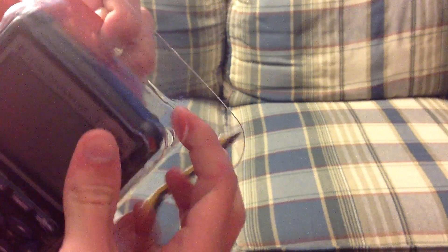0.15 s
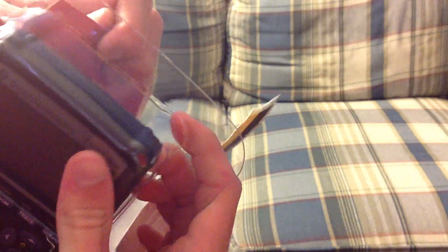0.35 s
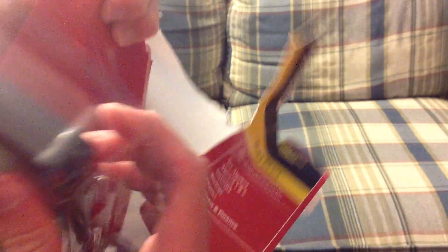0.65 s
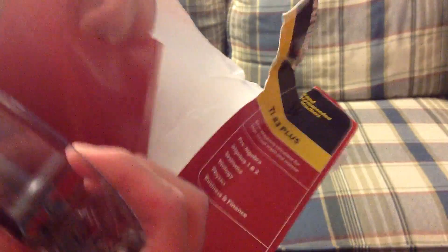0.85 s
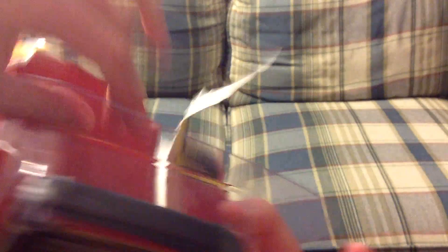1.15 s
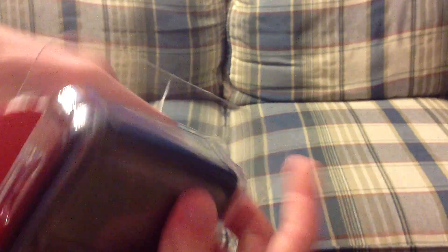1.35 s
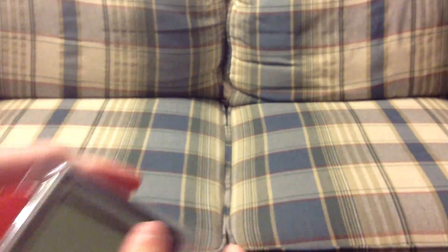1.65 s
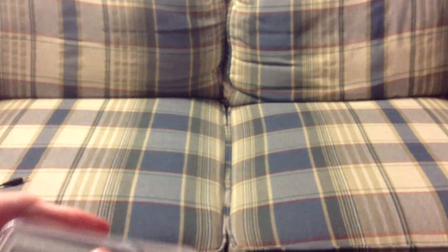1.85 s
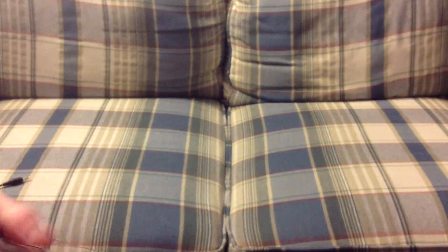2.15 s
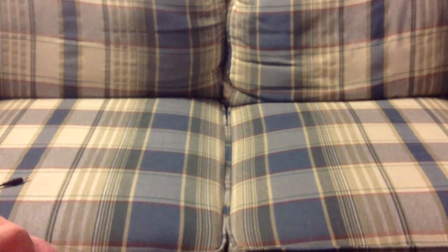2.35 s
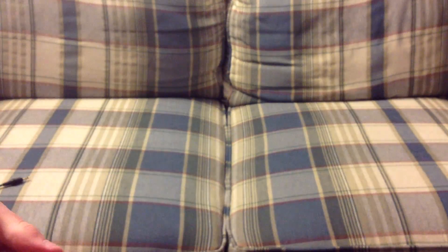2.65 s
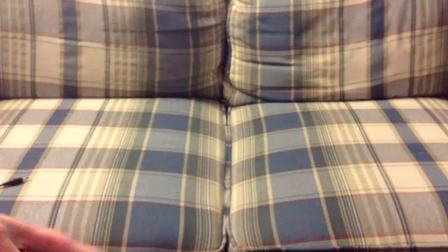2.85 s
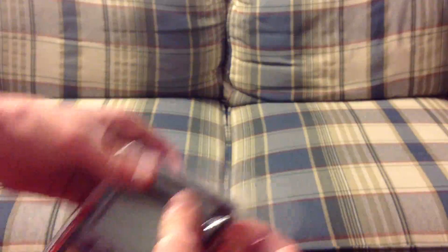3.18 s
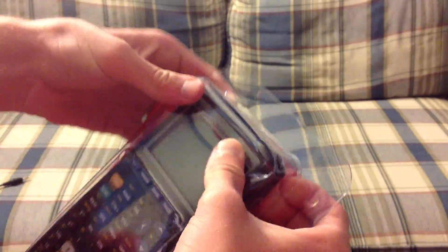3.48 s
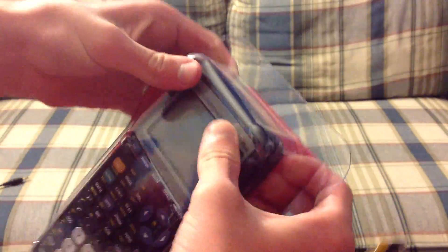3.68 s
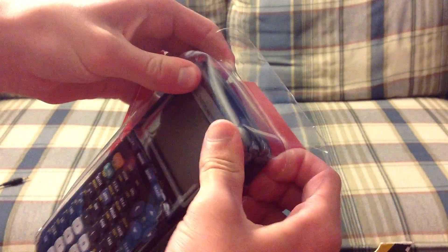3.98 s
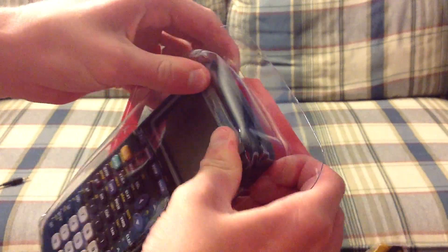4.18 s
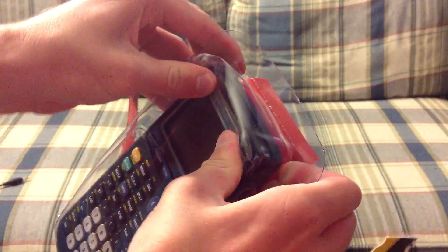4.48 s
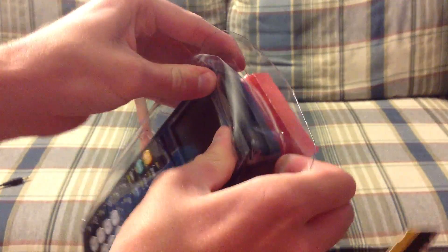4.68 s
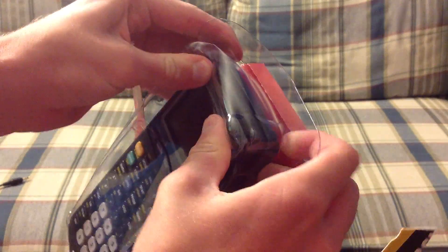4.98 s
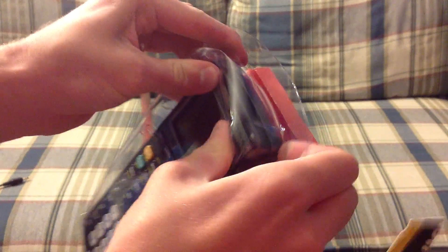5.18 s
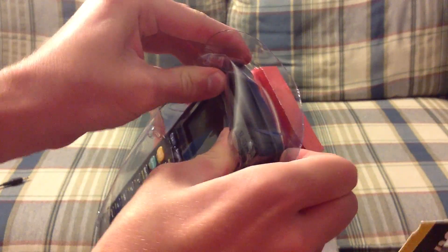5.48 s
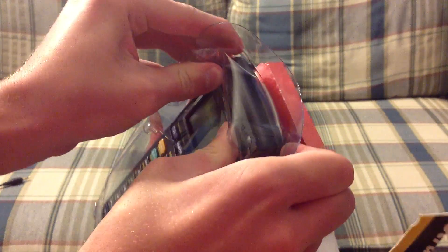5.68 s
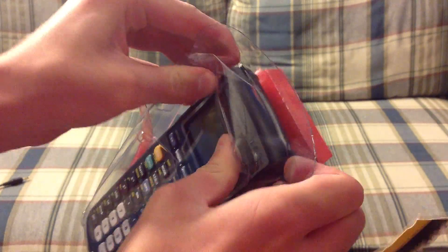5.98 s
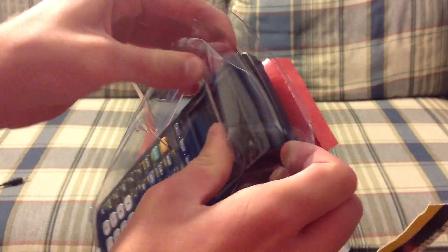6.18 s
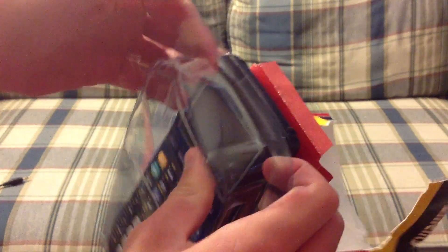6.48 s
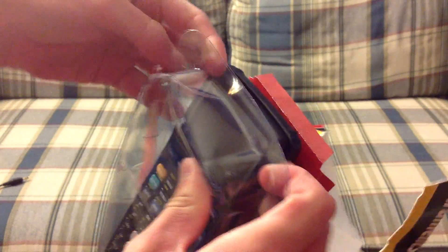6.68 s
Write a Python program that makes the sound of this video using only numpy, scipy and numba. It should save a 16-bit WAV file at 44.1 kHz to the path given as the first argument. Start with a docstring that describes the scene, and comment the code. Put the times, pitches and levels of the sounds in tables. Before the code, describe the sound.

Close by in a small furnished room, with faint steady hiss, hands work at a stiff plastic shell. From 0 to 0.3 s edges slip with short chattering clicks and a thin high ringing; scraping swells at 0.6 s, and another pair of slips bites at 0.83. Around 1.0-1.3 s plastic slides firmly on card with crackles, snaps and a brief singing edge. Snaps cluster at 1.7-2.1 s, with a bright crack at 2.3, then a lull. Soft sliding returns near 2.9 s; snaps follow, with a strong low hollow pop at 3.39. Small ticks and snaps thin out past 4.2 s into very quiet rustle, broken by two light snaps near 4.96. A fingertip creaks faintly at 5.4-5.6 s. A hard, bright pop lands at 5.81, hollow knocks at 6.23, and the loudest tight cluster of pops at 6.44, then quick slips at 6.6 and tiny ticks to 6.7.

```python
"""Opening a stiff plastic package

Hands work a pocket calculator out of a stiff clear plastic shell with a card insert, close by.
Panels of the shell buckle with snaps and hollow pops, made of fading tones and noise bursts.
Cut edges chatter, slip and sing; plastic and card slide and crackle, made of many tiny releases.
A small furnished room answers with fading reflections, over a faint steady hiss of shaped noise.
"""
import sys
import numpy as np
from scipy import signal
from scipy.fft import rfft, irfft, next_fast_len
from scipy.io import wavfile
from scipy.ndimage import map_coordinates
from numba import njit

SR = 44100
rng = np.random.default_rng(int(sys.argv[2]) if len(sys.argv) > 2 else 0)


def int16_out(signal):
    """Quantize to a 16-bit WAV file."""
    q = np.round(np.clip(np.atleast_2d(signal).T, -1, 1) * 32767)
    wavfile.write(sys.argv[1], SR, q.astype(np.int16))


N = 301203  # length in samples
TOP_HZ = 15700  # nothing is kept above this pitch
AGE = np.arange(SR // 8) / SR  # seconds since the start of a short sound
BLOW_S = 0.005  # the level of a short sound is its energy spread over this many seconds

# Panels buckling. Each row: start in seconds, ring level in dB, ring corner in Hz,
# crack level in dB, thump level in dB, name of the panel.
BUCKLINGS = [(1.0608, -34, 3560, -40.5, -57, "rim"), (1.341, -43, 2230, -48, -43, "rim"),
             (1.455, -33, 1730, -57, -47, "flap"), (1.7354, -37, 1670, -49, -39, "back"),
             (1.7659, -38, 2400, -47, -43, "flap"), (1.967, -37, 2780, -38, -31, "sheet"),
             (1.9733, -39, 2710, -40.5, -37, "flap"), (2.3221, -30, 3960, -30.5, -34, "rim"),
             (3.064, -36, 1770, -48, -31, "pocket"), (3.2131, -40.5, 3780, -40.5, -50, "pocket"),
             (3.335, -42, 1580, -49, -39.5, "rim"), (3.3904, -25, 1410, -51, -17, "back"),
             (3.674, -41, 2520, -69, -52, "rim"), (3.9015, -46, 2940, -51, -35, "pocket"),
             (3.9205, -38, 2000, -43.5, -35, "rim"), (4.0801, -67, 690, -74, -40, "rim"),
             (4.1537, -42, 4130, -49, -44, "rim"), (4.957, -40, 2470, -46, -60, "rim"),
             (4.9745, -36, 2370, -43, -62, "rim"), (5.8138, -25, 4580, -25, -15.5, "pocket"),
             (5.959, -31, 3580, -41.5, -32.5, "pocket"), (6.0569, -35, 1700, -68, -37.5, "rim"),
             (6.2235, -30, 860, -51, -28, "back"), (6.2301, -21, 1200, -45.5, -20.5, "back"),
             (6.4399, -14, 2570, -33.5, -8, "dome"), (6.4472, -19.5, 1550, -33.5, -14, "rim"),
             (6.455, -17.5, 1520, -42, -35, "rim")]
FOLD_CYCLES = 0.37  # a fold takes this many cycles of its corner pitch to give way

# The panels that can flip. Each name leads to: time to fade by 60 dB in seconds,
# typical share by which the grip shifts the pitch, modes (each: pitch in Hz, level in dB).
PANELS = {"sheet": (0.085, 0.01, [(160, 0), (400, -13)]), "back": (0.03, 0.01, [(245, 0), (370, -7),
          (835, -12), (1500, -13)]), "dome": (0.038, 0.004, [(295, 0), (568, -4.5), (1140, -11), (1400, -7),
          (1870, -14), (2120, -15), (2510, -16)]), "pocket": (0.021, 0.015, [(322, 0), (660, -15),
          (1560, -14), (2130, -17)]), "flap": (0.022, 0.07, [(180, -11), (350, 0)]),
          "rim": (0.015, 0.1, [(450, 0), (1300, -13)])}

# Edges scraping ever harder, then letting go. Each row: release in seconds,
# build-up time constant in seconds, ring level in dB, crack level in dB, thump level in dB.
EDGE_SLIPS = [(0.095, 0.0027, -32, -39.5, -42.5), (0.1422, 0.0047, -28, -49, -52),
              (0.545, 0.0053, -41.5, -60, -45), (0.831, 0.013, -35, -39, -43),
              (0.8397, 0.0052, -25, -28.5, -34.5), (1.118, 0.0023, -27, -27, -35.5),
              (1.237, 0.0033, -33, -31.5, -33), (2.07, 0.0048, -25.5, -36, -47),
              (6.6041, 0.0074, -37.5, -50, -68), (6.634, 0.0045, -38, -38, -44.5)]

# Freed edges singing. Each row: start in seconds, starting level in dB, pitch in Hz.
EDGE_ZINGS = [(0.145, -41, 4220), (0.146, -44, 6900), (1.125, -47, 5240), (1.172, -46, 5530)]

# Small creases ticking. Each row: start in seconds, ring level in dB.
CREASE_TICKS = [(0.229, -45), (0.5173, -51), (0.6045, -42), (0.6195, -41), (0.7777, -39.5), (0.9872, -33),
                (1.036, -36), (1.171, -46), (1.217, -44), (1.2515, -36), (1.622, -44), (2.0587, -50),
                (3.6325, -48), (3.6848, -47), (3.863, -52.5), (3.8737, -47.5), (3.887, -53), (4.604, -53.5),
                (5.749, -47.5), (6.2403, -38), (6.6909, -46), (6.7112, -44)]
TICK_CRACK_DB = -12  # sharp edge of a tick, relative to its ring

# A fingertip juddering over the shell. Each row: start in seconds, length in seconds, level in dB.
FINGER_DRAGS = [(5.419, 0.079, -53.5), (5.523, 0.033, -48), (5.589, 0.033, -46.5)]
DRAG_SLIPS_PER_S = 230  # roughly, as the gaps are uneven

# Strokes of plastic sliding on card and fingers. Each row: middle in seconds, length in seconds,
# scrape level in dB, hiss level in dB, pitch of the rubbed span in Hz.
SLIDING_STROKES = [(0.023, 0.06, -45, -55, 3440), (0.177, 0.34, -52.5, -53, 1890),
                   (0.284, 0.038, -51, -53.5, 1400), (0.6, 0.48, -51, -53, 1440),
                   (0.603, 0.093, -39.5, -50, 2180), (0.813, 0.2, -42, -50, 1250),
                   (1.014, 0.15, -37.5, -42.5, 1290), (1.187, 0.054, -41, -44.5, 980),
                   (1.256, 0.098, -47, -48, 1770), (1.714, 0.19, -52.5, -52, 1700),
                   (2.068, 0.061, -41, -42, 1760), (2.9, 0.21, -56.5, -53, 2470),
                   (3.038, 0.23, -52.5, -51.5, 2340), (3.188, 0.14, -51.5, -52.5, 5800),
                   (3.439, 0.079, -47.5, -52.5, 3420), (4.238, 0.049, -53.5, -55.5, 2090),
                   (4.26, 0.45, -71, -78, 2160), (5.456, 1, -67, -68.5, 1330),
                   (5.612, 0.079, -49.5, -53, 1610), (6.258, 0.14, -47.5, -59, 1030),
                   (6.461, 0.052, -36.5, -57, 2020), (6.633, 0.047, -38.5, -43, 2370),
                   (6.7, 1, -61, -69, 1440)]
STROKE_FADE_DB = 15  # how far a stroke has dropped at either end of its length
STROKE_SHAPE = 1.93  # 1 = pointed swell, 2 = round bell
REST_SCRAPE_DB, REST_HISS_DB = -72.5, -69  # the hands never hold quite still

# Tiny random creases: how many, their level relative to the scrape of the moment, and its spread.
CREASES_PER_S, CREASE_DB, CREASE_SPREAD_DB = 170, -11.5, 3.5
CREASE_OCTAVES = 0.65  # spread of their pitch
CREASE_CYCLES = 2.5  # time constant of their fading, in cycles

# Bending modes of the shell. Each row: pitch in Hz, relative level in dB.
SHELL_MODES = [(568, 10), (720, -2.5), (841, -6), (1078, -16.5), (1140, 5), (1402, 5.5), (1590, 8.5),
               (1854, 2.5), (2134, 5), (2508, 5.5), (3256, 6.5), (4202, -5)]
# Tone colour of the dense bending waves. Each row: frequency in Hz, relative level in dB per Hz.
FLEX_COLOUR = [(200, -29), (450, 18.5), (1500, -0.5), (2600, 2), (4500, -3), (16000, -18.5)]
# Tone colour of sharp cracks and fine hiss. Each row: frequency in Hz, relative level in dB per Hz.
CRACK_COLOUR = [(1500, -31), (4000, 3), (6000, -0.5), (15500, -7)]
# Tone colour of rubbed plastic. Each row: frequency in Hz, relative level in dB per Hz.
SCRAPE_COLOUR = [(200, -31), (500, -7), (1000, 6), (2500, 3), (4500, -5.5), (9000, -30)]
# Tone colour of the air and walls of the shell. Each row: frequency in Hz, relative level in dB per Hz.
HOLLOW_COLOUR = [(100, -17), (300, 2), (600, 1), (800, -10.5), (1200, -8), (4500, -31.5)]
# Tone colour of the steady background. Each row: frequency in Hz, relative level in dB per Hz.
QUIET_COLOUR = [(30, -43), (140, -3), (360, -6), (560, -19.5), (2360, -16), (2760, -19.5), (15500, -23)]
QUIET_DB = -60  # level of the background before the microphone's bass cut

# How long the room rings. Each row: frequency in Hz, time to fade by 60 dB in seconds.
ROOM_FADE = [(120, 0.14), (300, 0.21), (5000, 0.25), (15000, 0.15)]
# How strongly the room answers. Each row: frequency in Hz, level of the answer in dB.
ROOM_LEVEL = [(100, -8.5), (280, -9), (520, -7.5), (2400, -11.5), (15000, -6)]


def amp(db):
    """Turns decibels into a gain."""
    return 10 ** (np.asarray(db) / 20)


def unit(x):
    """Scales a sound to an average (rms) strength of 1."""
    return x / np.sqrt(np.mean(x ** 2) + 1e-20)


def blow(x, db):
    """Gives a short sound the energy of BLOW_S seconds at this level."""
    return amp(db) * unit(x) * np.sqrt(BLOW_S * SR / len(x))


def along(points, hz):
    """Reads a curve of (Hz, value) points on a logarithmic pitch axis."""
    f, v = np.transpose(points)
    return np.interp(np.log(hz + 1), np.log(f + 1), v)


def colour(x, spectrum):
    """Filters a sound to a (Hz, dB) spectrum, with no sound ahead of its cause."""
    m = 2 * next_fast_len(len(x))
    log_gain = np.log(amp(along(spectrum, np.fft.rfftfreq(m, 1 / SR))))
    # folding the cepstrum forward in time makes the filter minimum phase
    cepstrum = irfft(log_gain)
    cepstrum[1:m // 2] *= 2
    cepstrum[m // 2 + 1:] = 0
    response = np.exp(rfft(cepstrum))
    return irfft(rfft(x, m) * response)[:len(x)]


def lowpass(x, hz, order):
    """Removes what lies above a pitch."""
    return signal.sosfilt(signal.butter(order, min(hz, TOP_HZ), fs=SR, output="sos"), x)


def highpass(x, hz):
    """Removes what lies below a pitch."""
    return signal.sosfilt(signal.butter(2, hz, "highpass", fs=SR, output="sos"), x)


def wobble(rate):
    """Draws a smooth random curve through this many random points a second."""
    knots = rng.standard_normal(int(N * rate / SR) + 4)
    return map_coordinates(knots, [np.arange(N) * rate / SR])


def add(track, s, x):
    """Mixes a sound into the track from time s in seconds."""
    part = track[max(round(s * SR), 0):][:len(x)]
    part += x[:len(part)]


def burst(t60):
    """Makes noise that starts at once and fades by 60 dB in t60 seconds."""
    return rng.standard_normal(len(AGE)) * amp(-60 * AGE / t60)


@njit
def resonate(x, hz, damping):
    """Drives one springy resonance whose pitch can move."""
    out = np.zeros(len(x))
    position = speed = 0.
    for i in range(len(x)):
        step = 2 * np.sin(np.pi * hz[i] / SR)
        position += step * speed
        speed += step * (x[i] - position - damping * speed)
        out[i] = speed
    return out


def snaps():
    """A buckling panel cracks, rings and thumps; a wide, soft fold rings duller."""
    out = np.zeros(N)
    for s, ring_db, corner_hz, crack_db, thump_db, panel in BUCKLINGS:
        shell = shell_ring(detune=0.025, scatter_db=1, flex_t60=0.042, flex_db=2)
        # the width of the fold picks the band of waves that it launches
        ring = highpass(lowpass(shell, corner_hz, order=3), corner_hz * 0.34)
        ring *= 1 - np.exp(-AGE * corner_hz / FOLD_CYCLES)
        crack = colour(burst(t60=0.016), CRACK_COLOUR)
        add(out, s, blow(ring, ring_db) + blow(crack, crack_db) + blow(thump(panel), thump_db))
    return out


def shell_ring(detune, scatter_db, flex_t60, flex_db):
    """Modes shift with the grip and sound at new strengths, over a blur of dense bending waves."""
    hz, db = np.transpose(SHELL_MODES)[:, :, None]
    t60 = 0.029 * (hz / 1000) ** -.5  # seconds; short waves die sooner
    shift, strength, side = rng.standard_normal((3, len(SHELL_MODES), 1))
    fading = np.sign(side) * amp(db + scatter_db * strength - 60 * AGE / t60)
    modes = fading * np.sin(2 * np.pi * hz * (1 + detune * shift) * AGE)
    blur = unit(colour(burst(flex_t60), FLEX_COLOUR))
    return unit(modes.sum(axis=0)) + amp(flex_db) * blur


def thump(panel, rise_cycles=0.29):
    """A panel flips and swings in its own modes, quick ones first, damped by the hand."""
    t60, grip, modes = PANELS[panel]
    hz, db = np.transpose(modes)[:, :, None]
    onset = 1 - np.exp(-AGE * hz / rise_cycles)
    shifted_hz = hz * (1 + grip * rng.standard_normal())
    swing = -(amp(db) * onset * np.sin(2 * np.pi * shifted_hz * AGE)).sum(axis=0)
    # slow motion radiates little sound
    return highpass(swing * amp(-60 * AGE / t60), hz.min() * 0.74)


def slips(lead=0.02, release=0.0006):
    """An edge chatters harder and harder until it comes free and the panel swings back (lead, release in s)."""
    out = np.zeros(N)
    for s, build, ring_db, crack_db, thump_db in EDGE_SLIPS:
        # the force grows up to the release, then collapses
        force = np.exp(np.minimum((AGE - lead) / build, (lead - AGE) / release))
        chatter = force * rng.standard_normal(len(AGE))
        shell = shell_ring(detune=.03, scatter_db=5, flex_t60=.005, flex_db=6)
        shell = shell * amp(-60 * AGE / 0.057)  # the rubbing edge damps it further
        ring = highpass(signal.fftconvolve(chatter, shell)[:len(AGE)], 1380)
        crack = colour(chatter, CRACK_COLOUR)
        add(out, s - lead, blow(ring, ring_db) + blow(crack, crack_db))
        add(out, s, blow(thump("flap"), thump_db))
    return out


def zings(t60=0.16, damping=0.02):
    """A freed edge skates on over the shell and sings in a narrow, slightly wandering band that fades."""
    out, t = np.zeros(N), np.arange(N) / SR
    for s, db, hz in EDGE_ZINGS:
        song = resonate(rng.standard_normal(N), hz * (1 + .01 * wobble(45)), damping)
        add(out, s, amp(db - 60 * t / t60) * unit(song))
    return out


def ticks():
    """A small crease gives one short dry tick."""
    out = np.zeros(N)
    for s, db in CREASE_TICKS:
        ring = highpass(shell_ring(detune=.06, scatter_db=3, flex_t60=.012, flex_db=3), 800)
        crack = colour(burst(t60=0.015), CRACK_COLOUR)
        add(out, s, blow(ring, db) + blow(crack, db + TICK_CRACK_DB))
    return out


def drags():
    """A fingertip sticks and slips at an uneven rate; each slip knocks the hollow shell: a low creak."""
    out = np.zeros(N)
    for s, length, db in FINGER_DRAGS:
        gaps, sizes = rng.standard_normal((2, 64))
        moments = np.cumsum(np.exp(.3 * gaps)) / DRAG_SLIPS_PER_S
        moments -= moments[0]
        keep = moments < length
        samples = (moments[keep] * SR).astype(int)
        knocks = np.bincount(samples, amp(3 * sizes[keep]), minlength=SR // 4)
        creak = colour(knocks, HOLLOW_COLOUR)
        # the level is that of the creak's energy spread over the drag
        add(out, s, amp(db) * unit(creak) * np.sqrt(length * SR / len(creak)))
    return out


def rubbing():
    """Plastic slides on card and fingers; the same releases ring the free span and fizz in the treble."""
    scrape_db, hiss_db, span_hz = hand_motion()
    grains = friction(rate=420, spread_db=5, smooth_db=-3)
    sheet = unit(colour(grains, SCRAPE_COLOUR))
    # the contact point wanders, and the ringing span with it
    ringing = unit(resonate(sheet, span_hz * 2 ** (0.1 * wobble(25)), 0.23))
    scrape = amp(scrape_db) * unit(sheet + ringing)
    fizz = colour(grains + rng.standard_normal(N), CRACK_COLOUR)
    hiss = amp(hiss_db) * unit(fizz)
    # the hands rumble even when little slides
    hollow = colour(friction(rate=300, spread_db=10, smooth_db=-1.5), HOLLOW_COLOUR)
    rumble = amp(0.49 * scrape_db - 29.5) * unit(hollow)
    # the grip trembles, so the sound comes in quick clumps; the fine hiss stays steadier
    pressure = unit(amp(2.4 * wobble(45) + 2 * wobble(140)))
    return pressure * (scrape + rumble) + pressure ** 0.91 * hiss


def hand_motion():
    """Strokes swell and fade as bells, the strongest counting most for the pitch: scrape dB, hiss dB, span Hz."""
    middle, length, scrape_db, hiss_db, hz = np.transpose(SLIDING_STROKES)[:, :, None]
    t = np.arange(N) / SR
    coarse = t[::64]  # slow curves need few points
    swell_db = -STROKE_FADE_DB * np.abs(2 * (coarse - middle) / length) ** STROKE_SHAPE
    scrape_power = amp(scrape_db + swell_db) ** 2 + 1e-20
    hiss_power = amp(hiss_db + swell_db) ** 2
    controls = (10 * np.log10(scrape_power.sum(axis=0) + amp(REST_SCRAPE_DB) ** 2),
                10 * np.log10(hiss_power.sum(axis=0) + amp(REST_HISS_DB) ** 2),
                (scrape_power * hz).sum(axis=0) / scrape_power.sum(axis=0))
    return [np.interp(t, coarse, control) for control in controls]


def friction(rate, spread_db, smooth_db):
    """Tiny stick-slip releases of very uneven size, rate a second, on smooth sliding noise."""
    moments = rng.random(N) < rate / SR
    sizes = amp(spread_db * np.clip(rng.standard_normal(N), -2, 2))
    releases = moments * rng.choice([-1, 1], N) * sizes
    return unit(unit(releases) + amp(smooth_db) * rng.standard_normal(N))


def crinkle():
    """Tiny creases ping at random, pitched around the rubbed span, louder as the hands work harder."""
    out = np.zeros(N)
    scrape_db, _, span_hz = hand_motion()
    count = int(CREASES_PER_S * N / SR)
    starts = rng.integers(N, size=count)
    variations = np.clip(rng.standard_normal((count, 2)), -2, 2)
    for i, (strength, width) in zip(starts, variations):
        hz = min(span_hz[i] * 2 ** (CREASE_OCTAVES * (width + .5)), TOP_HZ)
        cycles = AGE * hz
        ping = np.sin(2 * np.pi * cycles) * np.exp(-cycles / CREASE_CYCLES)
        add(out, i / SR, blow(ping, scrape_db[i] + CREASE_DB + CREASE_SPREAD_DB * strength))
    return out


def room(x, size=8192):
    """The package keeps moving, so the pattern of reflections keeps changing."""
    out = np.zeros(N)
    fade = signal.get_window("hann", 2 * size) ** .75
    padded = np.pad(x, (0, 2 * size))
    # overlapping pieces of sound each get a new random tail
    for start in range(0, N, size):
        piece = padded[start:start + 2 * size] * fade
        add(out, start / SR, signal.fftconvolve(piece, room_tail()))
    # scattered paths blur the pitch of the answer, so that it dies away as even noise
    return map_coordinates(out, [np.arange(N) + SR * .0002 * wobble(140)])


def room_tail(delay=0.00685, swell=0.00026):
    """The walls answer after a delay and a quick swell (both in s), each pitch fading at its own pace."""
    hz, t, z = signal.stft(rng.standard_normal(SR // 2), SR, nperseg=256)
    t60 = along(ROOM_FADE, hz)[:, None]
    fading = z * amp(-60 * t / t60) / np.sqrt(t60)  # equal energy at every pitch
    tail = signal.istft(fading, SR, nperseg=256)[1]
    tail *= 1 - np.exp(-np.maximum(np.arange(len(tail)) / SR - delay, 0) / swell)
    return colour(tail / np.linalg.norm(tail), ROOM_LEVEL)


def background():
    """Steady noise, shaped in tone, makes a faint hiss."""
    return amp(QUIET_DB) * unit(colour(rng.standard_normal(N), QUIET_COLOUR))


def scene():
    """The package and the room's answer sound over the steady background."""
    package = snaps() + slips() + zings() + ticks() + drags() + rubbing() + crinkle()
    return (package + room(package) + background())[None]


def record(dry):
    """The microphone sheds deep bass, and nothing is kept above the band limit."""
    thin = highpass(dry, 96)
    m = next_fast_len(N + SR // 2)
    kept = np.fft.rfftfreq(m, 1 / SR) < TOP_HZ
    return irfft(rfft(thin, m) * kept, m)[..., :N]


dry = scene()
out = record(dry)
int16_out(out)
```